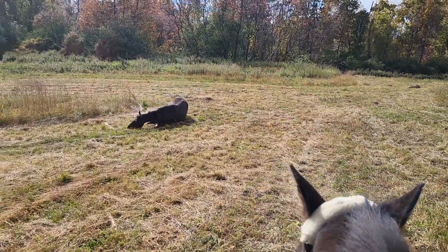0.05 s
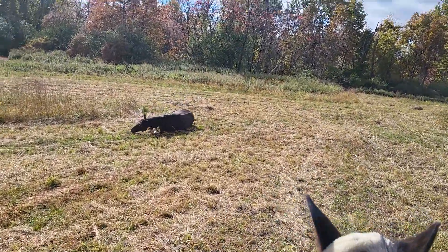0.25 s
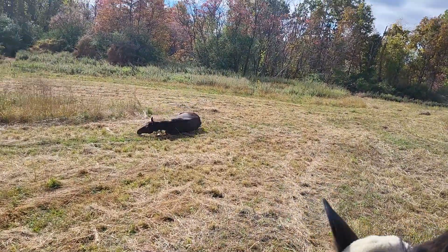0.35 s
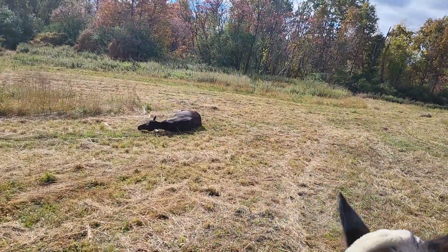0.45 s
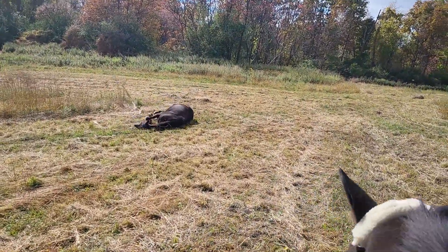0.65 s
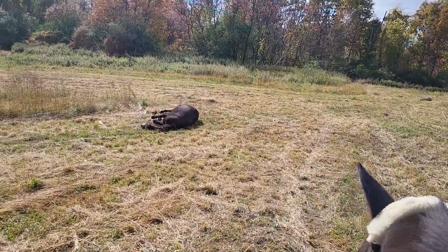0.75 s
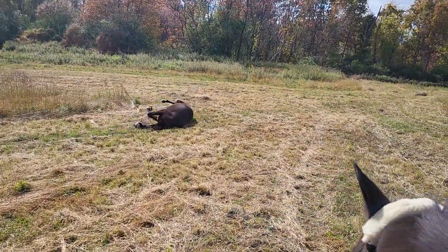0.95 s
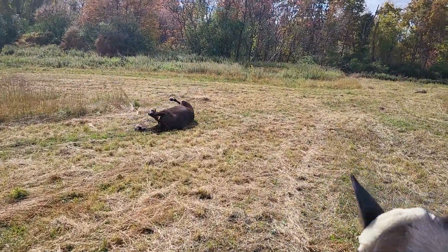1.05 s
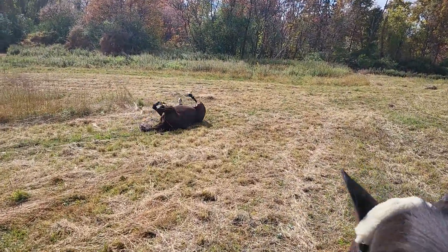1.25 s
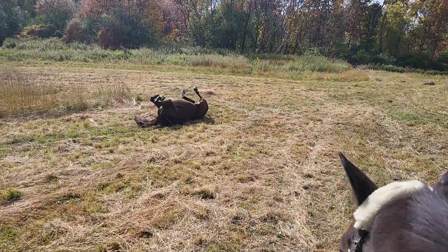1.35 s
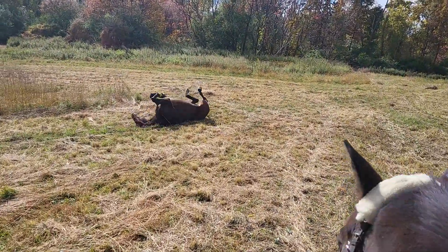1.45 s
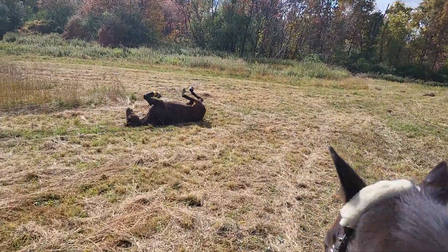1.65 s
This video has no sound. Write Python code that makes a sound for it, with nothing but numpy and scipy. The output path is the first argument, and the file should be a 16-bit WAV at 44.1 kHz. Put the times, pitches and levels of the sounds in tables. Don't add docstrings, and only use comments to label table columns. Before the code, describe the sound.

Low wind buffeting on the microphone, then lighter grass rustles, small ticks and faint cricket trills

```python
import sys
import numpy as np
from scipy import signal
from scipy.fft import rfft, irfft
from scipy.io import wavfile
from scipy.ndimage import uniform_filter1d, minimum_filter1d

SR = 44100
rng = np.random.default_rng(int(sys.argv[2]) if len(sys.argv) > 2 else 0)


def wav_record(signal):
    frames = np.transpose(np.atleast_2d(signal))
    bounded = np.clip(frames, -1, 1)
    quanta = np.round(bounded * 32767).astype(np.int16)
    wavfile.write(sys.argv[1], SR, quanta)


def volts_from_decibels(level):
    exponent = np.asarray(level, float) / 20
    return 10 ** exponent


N = 74970
T = np.arange(N) / SR


def evened(x):
    return x / np.sqrt(np.mean(x ** 2) + 1e-20)


def read(points, hz):
    point_hz, value = np.transpose(points)
    return np.interp(np.log(hz + 1), np.log(point_hz + 1), value)


def resonate(x, hz, width_hz):
    turn = np.exp(2j * np.pi * hz * T)
    r = np.exp(-np.pi * width_hz / SR)
    return 2 * (turn * signal.lfilter([1 - r], [1, -r], x / turn)).real


def slow(per_s):
    rates_hz = np.geomspace(.1, 1, 24) * per_s
    return evened(sum(np.sin(2 * np.pi * (f * T + rng.random())) for f in rates_hz))


def bump(s, half_s):
    return np.exp(-.5 * ((T - s) / half_s) ** 2)


# frequency in Hz, lead in radians.
LEAD = [(0, 0), (2000, -.4), (3400, -1.7), (16000, -1.7)]


def noise_pair(colour, patchy_db, likeness):
    frames, hz = N // 128 + 5, np.fft.rfftfreq(512, 1 / SR)
    a, b, c, d, patches = rng.standard_normal((frames, 257, 5)).T
    patches = uniform_filter1d(patches, size=8, axis=0)
    patches = evened(uniform_filter1d(patches, size=10, axis=1))
    turn = np.exp(-1j * read(LEAD, hz))[:, None]
    same = np.clip(likeness, 0, 1)
    left = a + 1j * b
    right = same * turn * left + np.sqrt(1 - same ** 2) * (c + 1j * d)
    z = np.array([left, right]) * volts_from_decibels(read(colour, hz)[:, None] + patchy_db * patches)
    return evened(signal.istft(z, nperseg=512, noverlap=384)[1][:, :N])


# time in seconds, left gain in dB, right gain in dB.
FACING = [(0, 1.5, 9.5), (.58, 1.5, 6.5), (.64, 1, 3), (1.099, 0.5, 2), (1.25, -3, 0), (1.4, 4, 5),
          (1.5, -3, 2.5), (1.7, -0.5, 0.5)]


def swing():
    s, left_db, right_db = np.transpose(FACING)
    return volts_from_decibels([np.interp(T, s, left_db), np.interp(T, s, right_db)])


# frequency in Hz, level in dB.
HUSH = [(120, -19), (300, -1), (700, -4.5), (1800, -14.5), (2800, -9.5), (5500, -7.5), (10000, -16.5),
        (13500, -9.5)]


def tree_hush():
    return volts_from_decibels(-62.5) * noise_pair(HUSH, patchy_db=1.0, likeness=0.52)


def far_chorus():
    hz, width_hz = 7560, 2 * 510
    chorus = [resonate(resonate(v, hz, width_hz), hz, width_hz) for v in rng.standard_normal((2, N))]
    return volts_from_decibels(-66) * evened(np.array(chorus))


# first chirp centre in seconds, chirps per second, centre in Hz,
# downward sweep in Hz, level in dB.
CRICKETS = [
    (.0547, 15.29, 7570, 300, -55.5),
    (.021, 15.29, 7450, 400, -60),
    (.016, 17.13, 8050, 250, -57),
    (.041, 18.65, 7900, 400, -58),
    (.05, 17.4, 8630, 100, -63),
    (.03, 16.2, 7250, 300, -63),
]
# time in seconds, gain in dB.
SHADE = [(0, 0.5), (.58, -4.5), (.66, -9.5), (1.3, -10.5), (1.45, -8), (1.7, 0)]


def crickets():
    chirp_s, spread_db, jitter_s, rasp_depth = .005, 2., .0012, .33
    out = np.zeros((2, N))
    for first, per_s, hz, sweep_hz, db in CRICKETS:
        count = np.round((T - first) * per_s).astype(int)
        size, turn, echo, late = rng.standard_normal((40, 4))[count + 2].T
        u = T - first - count / per_s - jitter_s * late
        rough = uniform_filter1d(uniform_filter1d(rng.standard_normal(N), size=70), size=70)
        rasp = 1 + rasp_depth * evened(rough)
        angle = 2 * np.pi * (hz * u - sweep_hz * u ** 2 / (6 * chirp_s) + turn)
        shape = rasp * volts_from_decibels(db + spread_db * size) * np.exp(-.5 * (u / chirp_s) ** 2)
        if db < CRICKETS[0][4]:
            shape = shape * volts_from_decibels(np.interp(T, *np.transpose(SHADE)))
        right_angle = angle - read(LEAD, hz) + 0.38 * echo
        out = out + shape * np.array([np.sin(angle), np.sin(right_angle)])
    return out


def far_field():
    trill = volts_from_decibels(2) * crickets() + far_chorus()
    return swing() * trill + swing() ** 1.17 * tree_hush()


# time in seconds, peak in dB, pitch in Hz, left over right in dB.
THUDS = [
    (.207, -45.5, 560, -8),
    (.996, -52, 470, -2.5),
    (1.075, -49, 560, -1.5),
    (1.058, -51, 400, 4),
    (1.407, -45, 436, -14.5),
    (.536, -41, 400, -23),
    (.59, -43, 380, -20),
]


def thuds():
    out = np.zeros((2, N))
    for s, db, hz, pan_db in THUDS:
        sides = volts_from_decibels([[db + pan_db / 2], [db - pan_db / 2]])
        out = out + sides * bump(s, .0011) * np.sin(2 * np.pi * hz * (T - s))
    return out


# time in seconds, peak in dB, low knock in dB, thin top in dB.
TICKS = [(0.216, -58, 11, -8), (0.537, -41, -18, 1), (.709, -61, -7, 18), (0.719, -64, -12, 15),
         (0.835, -40, -6, -16), (.988, -65, -7, 14), (1.047, -40.5, -36, -12), (1.076, -51, -1, -6),
         (1.099, -46, -17, -15), (1.145, -59, -2, 5), (1.15, -36, -8.5, -11), (1.171, -59, -10, 9),
         (1.219, -55, -4.5, -20), (1.336, -43.5, -29, -24), (1.393, -27, -38, -13.5), (1.415, -41, -14, 0),
         (1.543, -54, -11, -14), (1.568, -48, -22, -12), (1.601, -40.5, -23, -7.5)]
# start in seconds, pitch in Hz, level in dB, 60 dB decay in seconds.
RINGS = [
    (1.152, 1400, -61, .16),
    (1.153, 1450, -70, .08),
    (1.078, 1950, -65, .07),
]


def ticks():
    drive, out = np.zeros((3, N)), np.zeros(N)
    for s, db, knock_db, top_db in TICKS:
        for late_s, share in ((0, 1), (.0007, -.35)):
            drive[:, round((s + late_s) * SR)] = share * volts_from_decibels([db, db + knock_db, db + top_db])
    for v, (hz, width_hz) in zip(drive, ((5200, 3100), (1800, 1300), (12500, 6000))):
        for _ in range(3):
            v = resonate(v, hz, width_hz)
        out = out + v * SR / (2 * width_hz)
    for s, hz, db, t60 in RINGS:
        decay = volts_from_decibels(db - 60 * np.maximum(T - s, 0) / t60)
        out = out + (T > s) * decay * np.sin(2 * np.pi * hz * T)
    late = irfft(rfft(out) * np.exp(-1j * read(LEAD, np.fft.rfftfreq(N, 1 / SR))), N)
    return np.array([out, late]) * volts_from_decibels([[-1.2], [1.2]])


# start in seconds, length in seconds, level in dB, low body in dB.
STROKES = [(-.04, 0.045, -47, 3), (0.027, 0.19, -52.5, 1), (0.19, 0.15, -74, 14.5), (0.455, 0.18, -63, 4.5),
           (0.66, 0.21, -60, -8), (0.802, 0.1, -54.5, -3), (0.894, 0.11, -55, -5.5),
           (1.028, 0.067, -57.5, -2.5), (1.11, 0.15, -65.5, -5.5), (1.286, 0.1, -65.5, -4.5),
           (1.546, 0.14, -66, -3)]
# frequency in Hz, level in dB.
HISS = [(2000, -47), (3000, -14), (4000, -3.5), (5500, 0), (6700, -4), (8500, -17), (13000, -12),
        (16000, -13)]
# frequency in Hz, level in dB.
BODY = [(120, -14), (300, 0.5), (800, 0), (1900, 0.5), (2700, -10), (4000, -15.5)]


def grass():
    rise_s, fall_s, sag_db = 0.043, 0.02, -0.5
    hiss = noise_pair(HISS, patchy_db=1.5, likeness=0.067)
    body = noise_pair(BODY, patchy_db=-2.5, likeness=0.5)
    out = np.zeros((2, N))
    for s, length, db, body_db in STROKES:
        u = T - s
        rise = np.clip(u / rise_s, 0, 1)
        fall = np.exp(-np.maximum(u - length, 0) / fall_s)
        shape = rise * fall * volts_from_decibels(db + sag_db * np.clip(u / length, 0, 1))
        out = out + shape * (hiss + volts_from_decibels(body_db) * body)
    return out * volts_from_decibels(0.54 * slow(60)) * swing() / swing().mean(0)


# time in seconds, half length in seconds, peak in dB, pitch in Hz.
FLUTTERS = [(0.199, 0.0027, -40, 330), (0.559, 0.0037, -24.5, 280), (0.735, 0.0065, -49.5, 278),
            (1.278, 0.018, -57, 285), (1.309, 0.0074, -46, 277), (1.42, .007, -39.5, 367),
            (1.471, 0.012, -52.5, 383), (1.563, 0.0086, -53, 395), (1.595, 0.0045, -44.5, 410),
            (1.614, 0.0057, -64, 337), (1.634, 0.0068, -54.5, 407)]


def flutter():
    out = np.zeros(N)
    for s, half, db, hz in FLUTTERS:
        out = out + volts_from_decibels(db) * bump(s, half) * np.sin(2 * np.pi * hz * (T - s + 0.0007 * slow(90)))
    return [[.08], [1]] * out


# frequency in Hz, level in dB.
SWIRL = [(15, -47), (40, 2.5), (70, -9.5), (130, -11), (200, -15.5), (350, -25), (600, -45), (1000, -76)]


def wind_on_port(eddies, breeze_db, dull_db):
    throbs, power = np.zeros(N), np.zeros(N)
    for s, half, db, hz in eddies:
        shape = volts_from_decibels(db) * bump(s, half)
        throbs = throbs - shape * np.cos(2 * np.pi * hz * (T - s))
        power = power + shape ** 2
    throbs = signal.sosfiltfilt(signal.butter(2, 32, "high", fs=SR, output="sos"), throbs)

    smear = np.hanning(round(.045 * SR))
    level = np.sqrt(abs(signal.fftconvolve(power, smear / smear.sum(), "same")))
    bins_hz = np.fft.rfftfreq(N, 1 / SR)
    colour_db = read(SWIRL, bins_hz) + dull_db * np.log2(np.maximum(bins_hz / 150, 1))
    swirl = evened(irfft(rfft(rng.standard_normal(N)) * volts_from_decibels(colour_db), N))
    swirl = swirl / np.sqrt(uniform_filter1d(swirl ** 2, size=1500) + 0.0086)
    swirl = swirl * (volts_from_decibels(-13) * level + volts_from_decibels(breeze_db)) * volts_from_decibels(2.5 * slow(40))

    wind = throbs + swirl
    room_left = np.minimum(.72 / abs(signal.hilbert(wind)), 1)
    room_left = minimum_filter1d(room_left, size=600)
    return wind * uniform_filter1d(uniform_filter1d(room_left, size=300), size=300)


# time in seconds, half length in seconds, peak in dB, pitch in Hz.
LEFT_EDDIES = [(.036, 0.017, -32.5, 65.4), (.1, 0.0053, -30, 102), (.125, .03, -42, 61.5),
               (.175, 0.019, -33.5, 59), (.226, 0.0096, -19, 72), (.259, 0.011, -24.5, 62.5),
               (.323, .025, -28, 87), (.355, 0.0048, -40, 57), (.388, 0.017, -34.5, 97),
               (.419, 0.0074, -29, 91), (.45, 0.0092, -22.5, 110), (.474, 0.0027, -20, 109),
               (.508, 0.021, -24, 75), (.57, 0.0025, -17, 119), (.588, 0.0047, -16.5, 128),
               (.628, 0.0046, -28.5, 80), (.657, 0.017, -28.5, 62.4), (.717, 0.014, -33, 69),
               (.799, 0.013, -35.5, 62.5), (.848, 0.0037, -25.5, 93), (.871, 0.0066, -28.5, 96),
               (.89, 0.0092, -29, 60), (.918, 0.0078, -34, 69.6), (.985, 0.018, -41.5, 76.5),
               (1.055, 0.0025, -25.5, 140), (1.069, 0.0053, -23, 93), (1.178, .018, -40, 78.4),
               (1.244, 0.025, -40, 65.6), (1.305, 0.0072, -33, 105), (1.335, 0.0084, -30.5, 62.4),
               (1.356, 0.0029, -25, 112), (1.372, 0.0093, -27, 80), (1.399, 0.017, -23.5, 92.4),
               (1.426, 0.0085, -23, 106), (1.455, 0.0024, -22.5, 96), (1.48, .012, -31, 75),
               (1.522, 0.0062, -36.5, 117), (1.545, 0.0045, -39, 70.5), (1.566, 0.0086, -35.5, 68.4),
               (1.607, 0.0075, -33, 66), (1.645, .01, -48, 74), (1.675, 0.0067, -63, 75.5)]
# time in seconds, half length in
# seconds, peak in dB, pitch in Hz.
RIGHT_EDDIES = [(.0065, 0.0078, -14, 65), (.072, 0.017, -22, 51), (.128, 0.036, -23.5, 61),
                (.195, 0.0043, -18.5, 93), (.216, 0.01, -19, 63.4), (.231, 0.0058, -15, 80),
                (.248, 0.0035, -20.5, 110), (.265, 0.0048, -9, 71.5), (.286, 0.0062, -18, 87),
                (.299, 0.0029, -8, 117), (.315, 0.0041, -13, 67.5), (.372, 0.029, -32.5, 53),
                (.416, .005, -28, 90), (.441, 0.0034, -16.5, 74), (.476, 0.0023, -12.5, 126),
                (.498, 0.0031, -18, 142), (.514, 0.0072, -11, 81.5), (.536, 0.0028, -6, 134),
                (.556, 0.0025, -9.5, 120), (.567, 0.0012, -19, 151), (.5805, 0.011, 0, 75.2),
                (.872, 0.0092, -30, 88), (.891, 0.0098, -28.5, 59), (.916, 0.0058, -35.5, 95),
                (1.054, 0.001, -35.5, 132), (1.068, 0.0047, -25, 74), (1.084, 0.0092, -27, 63),
                (1.253, 0.019, -39.5, 73.4), (1.338, 0.0024, -36, 76), (1.36, 0.0099, -30, 61),
                (1.374, 0.0046, -23, 95), (1.394, 0.0092, -24.5, 86), (1.406, 0.0014, -17, 170),
                (1.478, 0.0044, -29.5, 95), (1.492, 0.0027, -29.5, 65),
                (.628, 0.0027, -28.5, 90), (0.653, 0.0032, -29, 80.5), (0.671, 0.0041, -28, 80.5),
               (0.725, 0.0059, -44, 84), (0.983, 0.0067, -41, 88), (1.276, 0.01, -46.5, 99),
               (1.309, 0.0049, -38, 90), (1.524, .0047, -38, 107), (0.197, 0.0018, -30.5, 241),
               (0.288, 0.00076, -44, 224), (0.3042, 0.0025, -23.5, 220)]


def wind():
    left = wind_on_port(LEFT_EDDIES, breeze_db=-57, dull_db=-8)
    right = wind_on_port(RIGHT_EDDIES, breeze_db=-86, dull_db=1)
    return np.array([left, right])


def scene():
    return far_field() + thuds() + ticks() + grass() + flutter() + wind()


def top_cut(x):
    return signal.sosfilt(signal.butter(12, 15900, fs=SR, output="sos"), x)


def record(dry):
    edge = signal.firwin(511, 15900, window=("kaiser", 9), fs=SR)
    mix = signal.oaconvolve(dry, edge[None], "same")
    return top_cut(mix)


dry = scene()
out = record(dry)
wav_record(out)
```